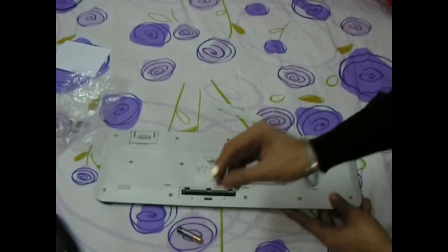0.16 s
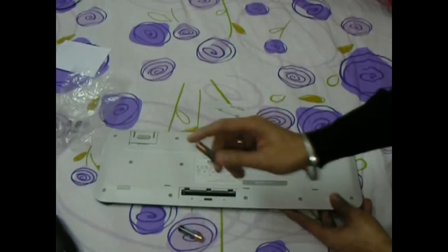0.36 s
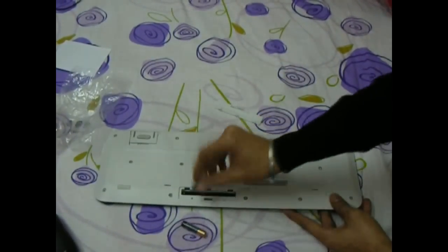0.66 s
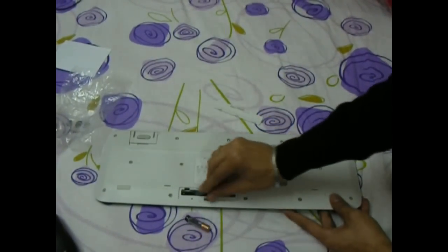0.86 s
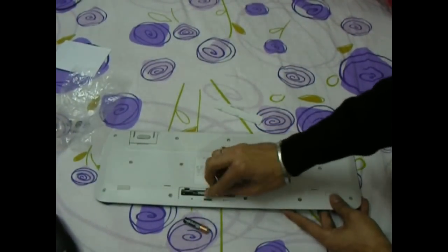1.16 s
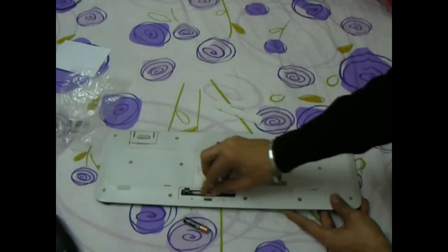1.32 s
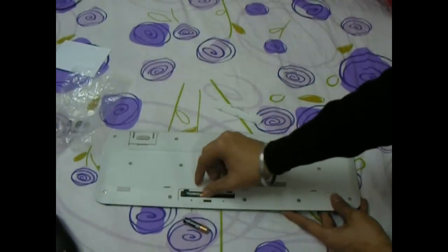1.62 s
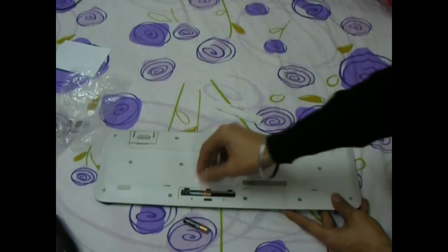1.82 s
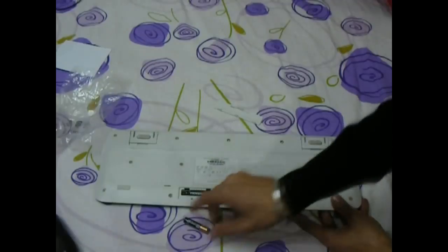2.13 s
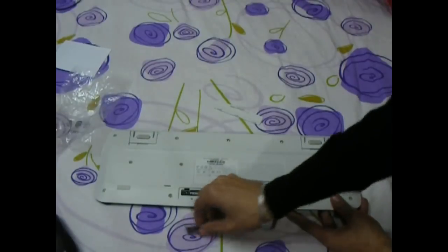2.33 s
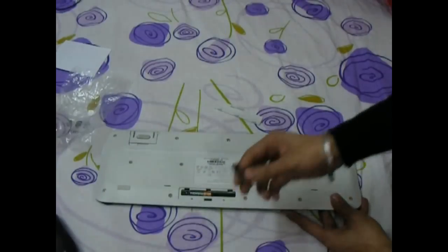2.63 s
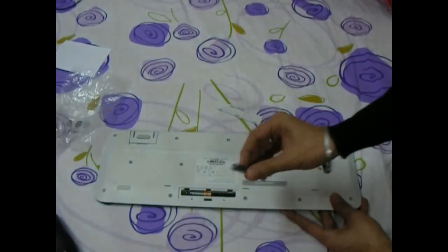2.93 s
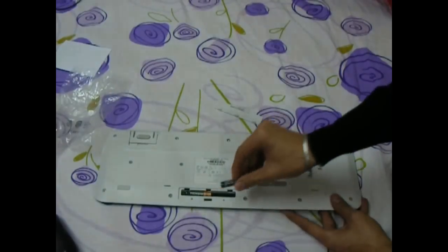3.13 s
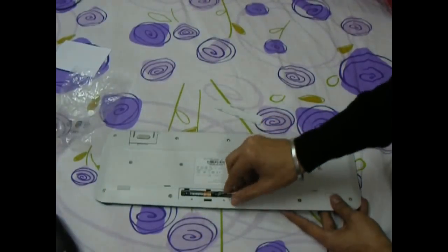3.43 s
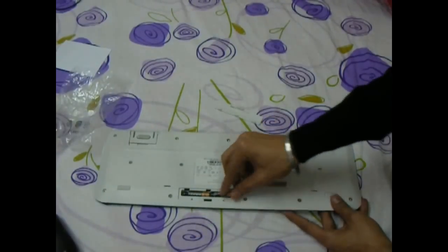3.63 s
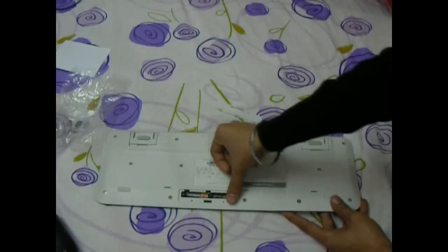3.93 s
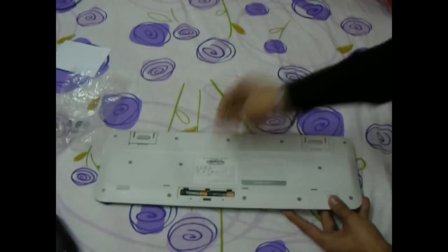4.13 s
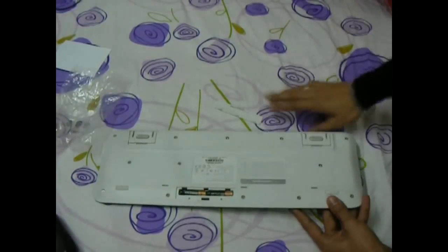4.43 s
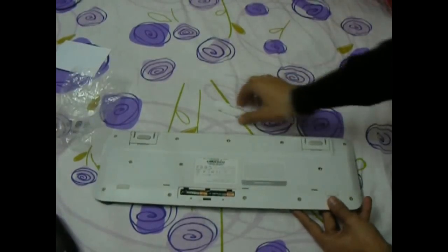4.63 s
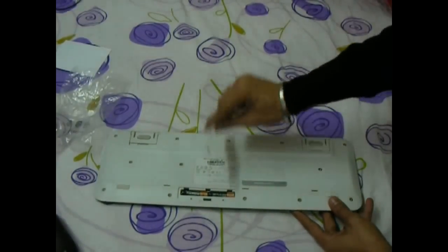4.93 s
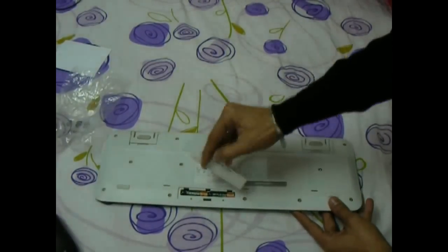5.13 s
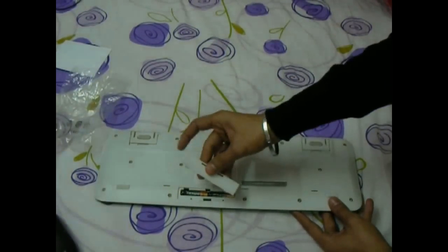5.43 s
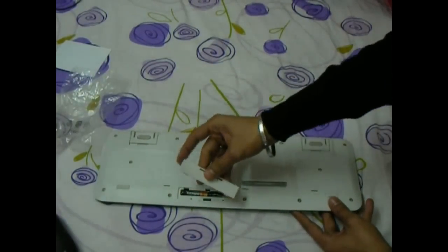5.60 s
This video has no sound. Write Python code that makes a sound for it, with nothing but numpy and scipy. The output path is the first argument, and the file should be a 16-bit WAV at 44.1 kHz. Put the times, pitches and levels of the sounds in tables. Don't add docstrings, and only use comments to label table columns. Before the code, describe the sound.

Small plastic clicks and sharp snaps as batteries are pressed into a keyboard's bay, over steady low hiss in a small room.

```python
import sys
import numpy as np
from scipy import signal
from scipy.io import wavfile
from scipy.ndimage import uniform_filter1d

SR = 44100
rng = np.random.default_rng(int(sys.argv[2]) if len(sys.argv) > 2 else 0)


def dump(signal):
    limited = np.clip(np.atleast_2d(signal).T, -1, 1)
    pcm = np.round(limited * 32767).astype(np.int16)
    wavfile.write(sys.argv[1], SR, pcm)


def level_to_linear(level):
    exponent = np.asarray(level, float) / 20
    return 10 ** exponent


N = 254016


def evened(x):
    return x / np.sqrt(np.mean(x ** 2) + 1e-20)


def read(points, hz):
    f, value = np.transpose(points)
    return np.interp(np.log(hz + 1), np.log(f + 1), value)


def add(mix, s, sound):
    part = mix[round(s * SR):][:len(sound)]
    part += sound[:len(part)]


# f/Hz, level/dB per Hz
NOISE_SPECTRUM = [(25, -14), (60, -15.5), (120, -14), (200, -9.5), (320, -5), (500, -5), (900, -7),
                  (1800, -12.5), (2800, -17), (3450, -21.5), (3900, -28.5), (5000, -36.5), (6000, -49.5),
                  (7200, -66.5)]
# t/s, level/dB
NOISE_DRIFT = [(0.0, -0.92), (5.76, -0.48)]


def hiss(patchy_db=-0.55, flicker_db=0.86):
    frames, hz = N // 256 + 5, np.fft.rfftfreq(1024, 1 / SR)
    real, imaginary, patches = rng.standard_normal((frames, 513, 3)).T
    patches = uniform_filter1d(patches, 12, 0)
    patches = evened(uniform_filter1d(patches, 10, 1))
    flicker = evened(uniform_filter1d(rng.standard_normal(frames), 6))
    level_db = read(NOISE_SPECTRUM, hz)[:, None] + patchy_db * patches + flicker_db * flicker
    spectra = (real + 1j * imaginary) * level_to_linear(level_db)
    noise = signal.istft(spectra, nperseg=1024, noverlap=768)[1][:N]
    drift_db = np.interp(np.arange(N) / SR, *np.transpose(NOISE_DRIFT))
    return level_to_linear(-42.5 + drift_db) * evened(noise)


# t/s, level/dB
ECHOES = [(.0045, -13.5), (.0075, -15.5), (.0125, -18), (.0145, -7.5), (.017, -15.5), (.021, -10.5),
          (.025, -22)]
# f/Hz, T60/s
REVERB_TIME = [(300, 0.4), (700, 0.27), (1700, 0.28), (3000, 0.27), (5000, 0.26)]


def room(x):
    tail_start_s, tail_rise_s, tail_db = 0.0071, 0.0018, -1
    taps = np.zeros(SR // 2)
    at = np.arange(0, len(taps) - 20, 20)
    taps[at + rng.integers(0, 20, len(at))] = rng.choice([-1., 1.], len(at))
    hz, t, z = signal.stft(taps, SR, nperseg=256)
    z = z / np.sqrt(uniform_filter1d(abs(z) ** 2, size=5, axis=1) + 1e-12)
    decay = level_to_linear(-60 * t / read(REVERB_TIME, hz)[:, None])
    tail = signal.istft(z * decay, SR, nperseg=256)[1]
    since_start = np.maximum(np.arange(len(tail)) / SR - tail_start_s, 0)
    tail *= 1 - np.exp(-since_start / tail_rise_s)
    tail *= level_to_linear(tail_db) / np.linalg.norm(tail)
    for k, (s, db) in enumerate(ECHOES):
        add(tail, s, (-1) ** k * level_to_linear(db) * np.ones(1))
    return signal.fftconvolve(x, tail)[:N]


# t/s, length/s, level/dB
RUSTLES = [
    (1.247, 0.033, -46),
    (2.101, 0.016, -42.5),
    (2.598, 0.027, -45),
    (3.569, 0.017, -39.5),
    (4.65, 0.063, -47.5),
    (4.966, 0.044, -46.5),
]


def rustle():
    t = np.arange(N) / SR
    swell = sum(level_to_linear(db) * np.exp(-((t - s) / length) ** 2) for s, length, db in RUSTLES)
    grain = level_to_linear(1.7 * evened(uniform_filter1d(rng.standard_normal(N), 130)))
    band = signal.butter(4, [450, 2400], "band", fs=SR, output="sos")
    return swell * evened(grain * signal.sosfilt(band, rng.standard_normal(N)))


# f/Hz, level/dB
SHELL_MODES = [(220, -7), (310, -16), (460, -1.5), (640, 2.5), (850, 2.5), (1130, 2.1), (1300, -3.5),
               (1490, 0.5), (1770, -5), (2080, -1), (2440, 0.5), (2830, 1.5), (3350, -1), (3700, 7),
               (4400, 2), (4800, -10.5), (5300, -0.5), (5800, -11), (6400, -22.5)]
GROUP_HZ = [600, 1300, 2500, 4800]


def clicks(table, t60, scatter_db, focus_db, detune=0.059, rise_turns=0.62, loose=1.09):
    out, t = np.zeros(N), np.arange(3000) / SR
    hz, db = np.transpose(SHELL_MODES)
    chance = rng.standard_normal((len(table), 3, len(hz)))
    damping = 60 / t60 * (hz[:, None] / 1300) ** 0.38
    rise = (1 - np.exp(-t * hz[:, None] / rise_turns)) ** 2
    turn = np.pi * np.arange(len(hz))
    for (s, blow_db, weight_db, hard_db, ring_hz), (level, pitch, phase) in zip(table, chance):
        groups = [weight_db, 0, hard_db, hard_db - 21.5]
        group_db = read(list(zip(GROUP_HZ, groups)), hz)
        group_db += focus_db * np.exp(-(np.log(hz / ring_hz) / 0.067) ** 2)
        size = level_to_linear((db + group_db + scatter_db * level)[:, None] - damping * t) * rise
        mode_hz = hz * (1 + detune * pitch)
        angle = 2 * np.pi * mode_hz[:, None] * t + (turn + loose * phase)[:, None]
        ring = (size * np.sin(angle)).sum(0)
        peak = level_to_linear(blow_db) * np.linalg.norm(level_to_linear(np.array(groups)))
        add(out, s, peak * ring / abs(ring).max())
    return out


# t/s, blow level/dB, hardness level/dB, strongest ring f/Hz
TICKS = [(0.015, -33, -3.5, 1100), (0.0348, -32.5, -5, 571), (0.1079, -38, 3, 1140),
         (0.1254, -28, -10, 1030), (0.208, -34.5, 1, 651), (0.2254, -32, -10, 1225),
         (0.3083, -33.5, 2.5, 1280), (0.4083, -34.5, 1.5, 1970), (0.4173, -28, -1, 1130),
         (0.518, -24, -5.5, 1130), (0.6087, -31, -5.5, 1060), (0.7091, -27, -9, 1130),
         (0.736, -38, -1, 624), (1.013, -38.5, 3, 1710), (1.3621, -30, -21, 1150), (1.7667, -34, -10, 1010),
         (4.572, -34, -16, 1250)]


def handling_ticks():
    blows = [(s, db, -25, hard, hz) for s, db, hard, hz in TICKS]
    direct = clicks(blows, t60=0.024, scatter_db=0.5, focus_db=12.5)
    spread = clicks(blows, t60=0.027, scatter_db=-4.5, focus_db=14.0)
    return direct, level_to_linear(-11) * spread


# t/s, blow level/dB, weight
# level/dB, hardness level/dB, strongest ring f/Hz
SNAPS = [(1.0525, -29, 3, 3.5, 600), (1.1373, -17.5, -14, -4.5, 1210), (1.2314, -37.5, 8.5, -19, 630),
         (1.2544, -30, -10.5, -26, 851), (1.6400, -30, -6, -10, 633), (1.6626, -21, -10, -5.5, 638),
         (1.6798, -31.5, 3, 3.5, 638), (1.6994, -34, -1, -9, 636), (2.0877, -26.5, -0.5, -3, 1060),
         (2.1192, -31, -5, -23, 1060), (3.5314, -18.5, -7.5, -16, 465), (3.5578, -18.5, -5.5, -14, 850),
         (3.5648, -27.5, 4.5, -4.5, 1150), (3.91, -17, -3, -10.5, 790),
         (1.0579, -38, 15, -12, 316),
    (3.8444, -29, -3, 3, 2820),
    (1.4280, -24, -6, -19, 1000),
    (1.4330, -26.5, 7, 11, 2840),
    (1.436, -31, -14, 2, 2420),
    (3.664, -13, -7, -9, 894),
    (4.1626, -22.5, 3.5, -2.5, 1060),
    (4.1773, -8.5, -19, -4.5, 1300),
]


def spring_snaps():
    blows = SNAPS
    direct = clicks(blows, t60=0.017, scatter_db=4.0, focus_db=10.0)
    spread = clicks(blows, t60=0.011, scatter_db=1.7, focus_db=7.0, detune=0.016, loose=0.27)
    return direct, level_to_linear(-2.6) * spread


# t/s, blow level/dB, weight level/dB, hardness level/dB, strongest ring f/Hz
SEATINGS = [
    (3.6785, -5, -8, -11, 870),
    (4.0098, -8, -3, -4, 1153),
    (1.4393, -5.6, -10, 4, 1480),
    (4.1803, .5, -8, -7, 840),
]


def cell_seatings():
    direct = clicks(SEATINGS, t60=0.031, scatter_db=4.0, focus_db=3.5, rise_turns=0.85, loose=0.55)
    spread = clicks(SEATINGS, t60=0.0086, scatter_db=1.7, focus_db=5.0, detune=0.0084, loose=0.15)
    return direct, level_to_linear(-0.9) * spread


def microphone(x):
    bass_loss = signal.butter(2, 200, "high", fs=SR, output="sos")
    housing_dip = signal.tf2sos(*signal.iirnotch(3950, 5.5, fs=SR))
    treble_loss = signal.butter(12, 6300, fs=SR, output="sos")
    return signal.sosfilt(np.vstack([bass_loss, housing_dip, treble_loss]), x)


def scene():
    sources = [handling_ticks(), spring_snaps(), cell_seatings()]
    direct = sum(near for near, _ in sources)
    spread = sum(far for _, far in sources)
    return (microphone(direct + room(spread) + rustle()) + hiss())[None]


def top_cut(x):
    return signal.sosfilt(signal.butter(12, 15400, fs=SR, output="sos"), x)


def record(dry):
    start_s, length_s, offset = 0.0550, 0.0045, -0.0304
    from_middle = abs(np.arange(N) / SR - start_s - length_s / 2)
    gap = np.clip(from_middle / length_s * 8 - 4, 0.15, 1)
    clipped = np.clip(dry * gap + offset, -0.96, 0.94)
    low_pass = signal.firwin(255, 13600, fs=SR)[None]
    limited = signal.oaconvolve(clipped - offset, low_pass, "same") + offset
    limited = limited + level_to_linear(-97.5) * rng.standard_normal(N)
    return top_cut(limited)


dry = scene()
out = record(dry)
dump(out)
```